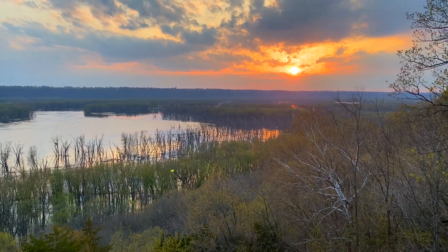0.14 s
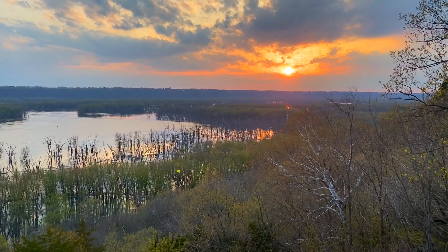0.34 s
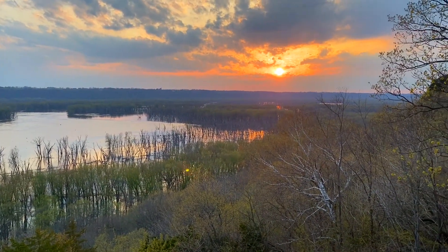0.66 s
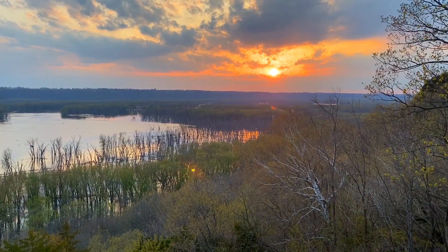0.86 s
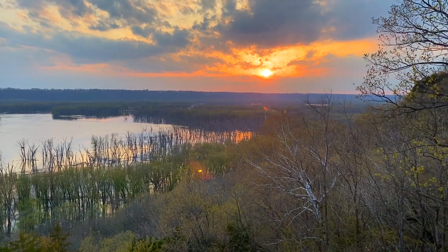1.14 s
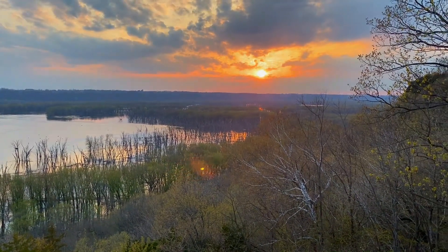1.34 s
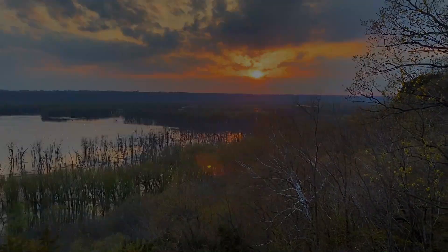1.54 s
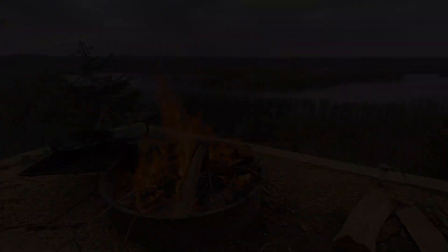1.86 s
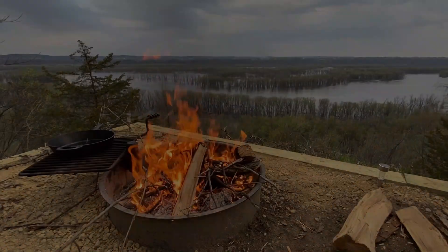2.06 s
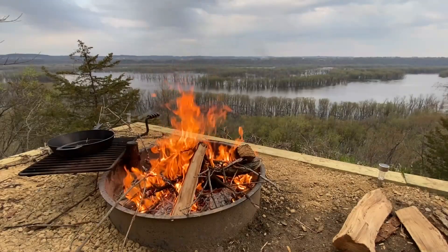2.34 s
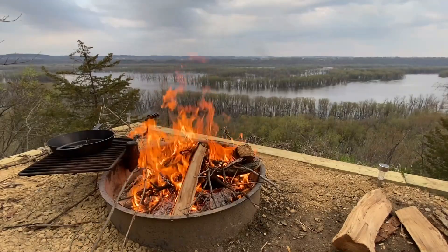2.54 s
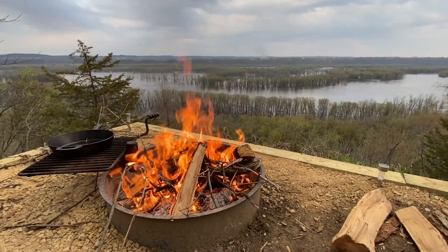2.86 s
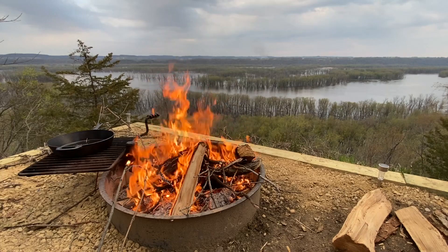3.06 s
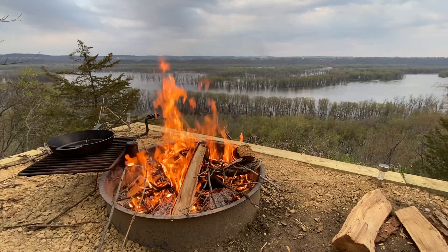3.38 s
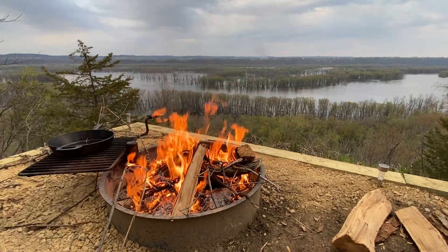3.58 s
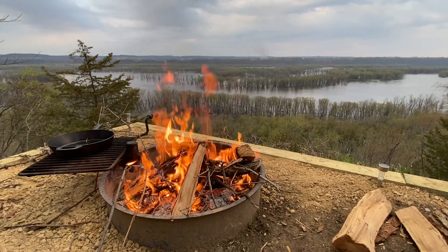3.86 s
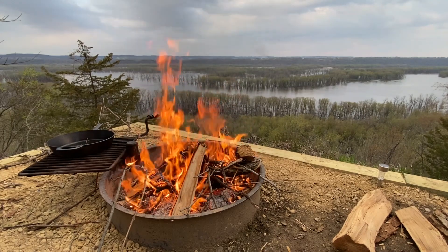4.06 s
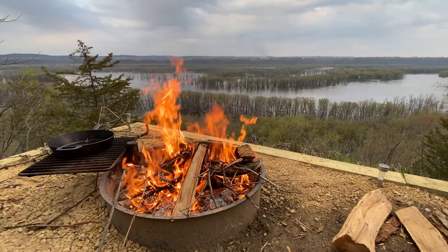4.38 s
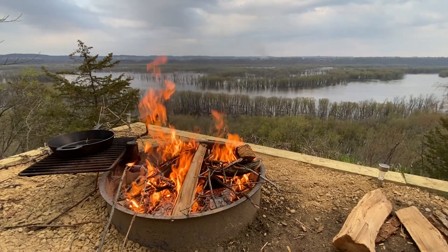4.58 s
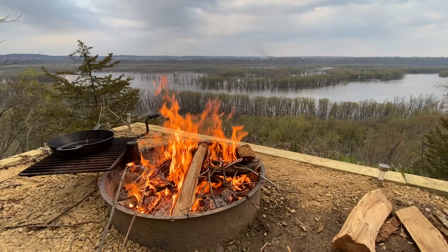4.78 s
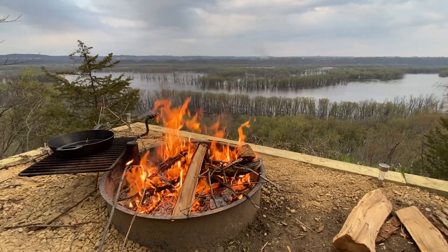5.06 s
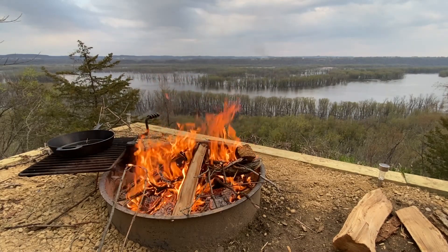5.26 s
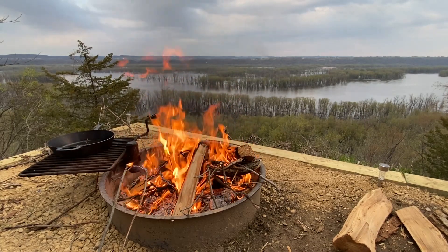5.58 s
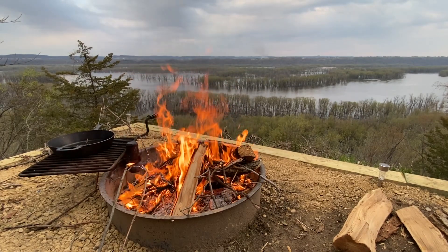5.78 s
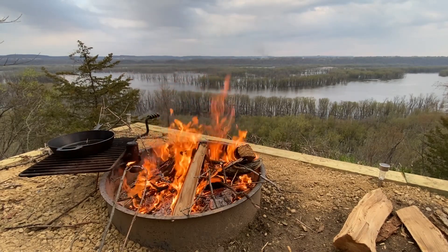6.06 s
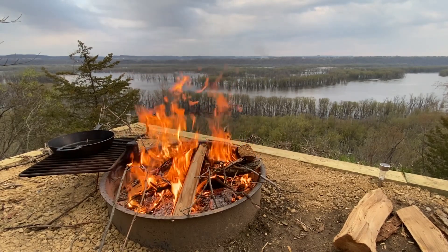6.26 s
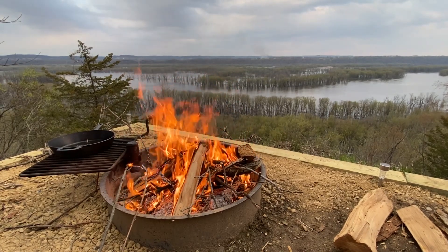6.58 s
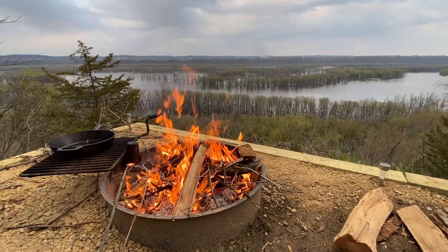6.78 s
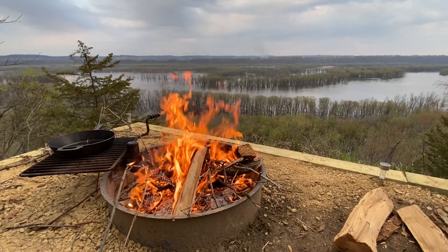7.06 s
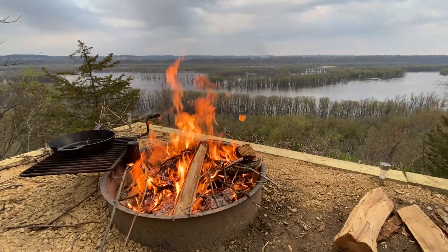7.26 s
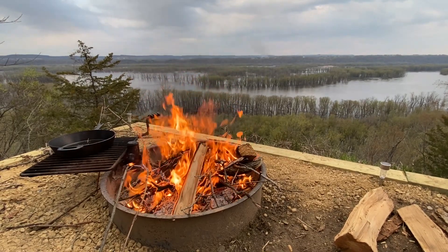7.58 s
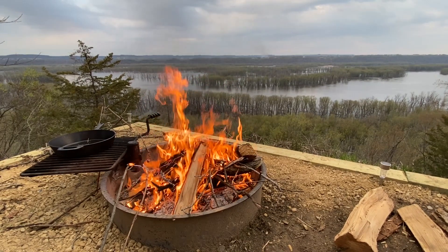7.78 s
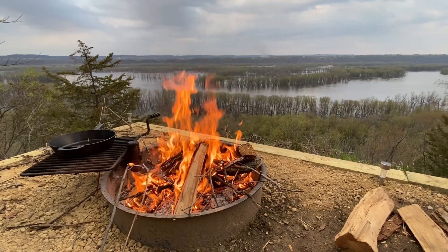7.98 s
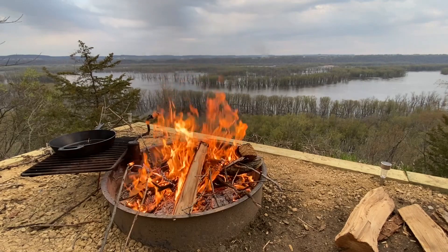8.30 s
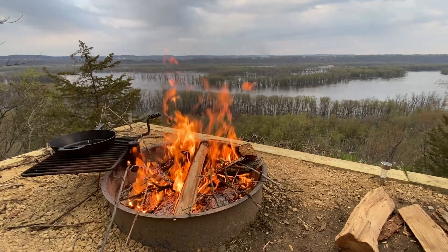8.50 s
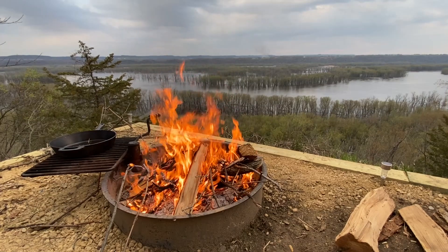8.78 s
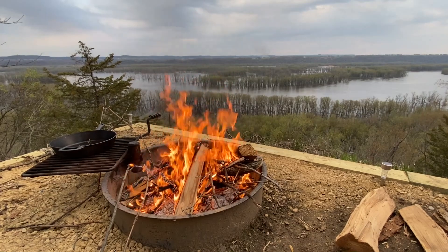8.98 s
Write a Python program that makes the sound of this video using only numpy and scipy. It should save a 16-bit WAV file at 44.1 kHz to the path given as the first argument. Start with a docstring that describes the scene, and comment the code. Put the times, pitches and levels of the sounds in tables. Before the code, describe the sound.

First, very soft open air with faint rumble, a small bird repeating upward chirped whistles, and blurred honks far away; dry twigs click. Then a hard cut brings a close outdoor campfire: uneven low flame rumble, light hiss, countless tiny ticks and scattered bright cracks spread across left and right. A brief gas hiss comes midway, and later heavy snaps and two woody thuds, before crackling continues to the end.

```python
"""A songbird repeats an upslurred whistle on a bluff above a river at dusk, over a far rumble; other birds call
far off, twigs tick and leaves brush past. The voices are gliding sines, the rest is shaped noise.
Then at once a wood fire in a steel ring, close by: filtered noise roars, flutters and sizzles, short noise bursts
tick and pop, decaying sines ring and thud in the wood, and one pocket vents in a short jet that flares.
Left and right each hear the fire with their own colour."""
import sys
import numpy as np
from scipy import signal
from scipy.fft import rfft, irfft, next_fast_len
from scipy.io import wavfile
from scipy.ndimage import map_coordinates

SR = 44100
rng = np.random.default_rng(int(sys.argv[2]) if len(sys.argv) > 2 else 0)


def store_pcm(level_fs):
    """Save levels as 16-bit WAV."""
    pcm = np.round(np.clip(level_fs, -1, 1) * 32767).astype(np.int16)
    wavfile.write(sys.argv[1], SR, np.atleast_2d(pcm).T)


N = 403074
TIME = np.arange(N) / SR  # s
FIRE_START = 1.815  # s

# Colour each side gives to the fire's cracks, steam and gas. Each row: frequency in Hz, left gain in dB, right
# gain in dB.
SIDE_COLOUR = [(306, -21.5, -11), (920, -2.5, -1.5), (2240, -4, -8.5), (2860, -8.5, -4), (3470, -3, 3.5),
               (4900, 0.5, -1.5), (5380, -5, -22), (5710, -5, 5.5), (6000, -6, -7), (6610, 1.5, 3.5),
               (7500, -13.5, -11), (9730, -4, -2.5), (14750, -3, -3), (16500, -19, -19.5)]


def amp(db):
    """Decibels to gain."""
    return 10 ** (np.asarray(db) / 20)


def unit(x):
    """x at rms 1."""
    return x / np.sqrt(np.mean(x ** 2) + 1e-20)


def along(points, hz, axis=1):
    """One column of (Hz, ..) points, read on a log frequency axis."""
    table = np.array(points, float)
    return np.interp(np.log(hz + 1), np.log(table[:, 0] + 1), table[:, axis])


def wobble(rate):
    """A smooth random curve through normally distributed knots, rate knots a second."""
    knots = rng.standard_normal(int(N * rate / SR) + 4)
    return map_coordinates(knots, [TIME * rate])


def filtered(x, response):
    """x times a gain or complex response of frequency."""
    size = 2 * next_fast_len((N + SR) // 2)
    hz = np.fft.rfftfreq(size, 1 / SR)
    return irfft(rfft(x, size) * response(hz), size)[..., :N]


def causal(gain):
    """The minimum-phase response with this gain: it rings after a click, never before."""
    cepstrum = irfft(np.log(np.maximum(gain, 1e-6)))
    half = cepstrum.shape[-1] // 2
    cepstrum[..., 1:half] *= 2
    cepstrum[..., half + 1:] = 0
    return np.exp(rfft(cepstrum))


def draught(apart):
    """Stereo white noise: one part common to both sides, plus apart times a part of each side's own."""
    return rng.standard_normal(N) + apart * rng.standard_normal((2, N))


def woods(x, t60, wet_db):
    """Trees scatter a call into a decaying diffuse tail, different on each side."""
    t = np.arange(SR) / SR
    tail = rng.standard_normal((2, SR)) * amp(-60 * t / t60)
    tail /= np.linalg.norm(tail[0])
    return amp(wet_db) * signal.fftconvolve(x[None], tail, axes=1)[:, :N]


def bursts(rows, octaves, snap_t60, tail_db, tail_t60, ring=5.1, sharpness=14, apart=1.0, size=1024):
    """Stereo noise bursts (s, dB over 5 ms, centre Hz): a sharp snap, then scatter that differs left and right."""
    s, db, centre = np.transpose(rows)
    lead_in = size // 16  # samples
    t = (np.arange(size) - lead_in) / SR
    age = np.maximum(t, 0)
    common = rng.standard_normal((len(s), size))
    own = rng.standard_normal((2, len(s), size))
    snap = common * amp(-60 * age / snap_t60)
    scatter = (common + apart * own) * amp(tail_db - 60 * age / tail_t60)
    hz = np.fft.rfftfreq(size, 1 / SR) + 1
    band = np.exp(-.5 * (np.log2(hz / centre[:, None]) / octaves) ** 2)
    # every splinter rings briefly at a pitch of its own near the centre of its burst
    pitch = centre[:, None] * 2 ** (0.22 * rng.standard_normal((len(s), 1)))
    detune = hz / pitch
    splinter = 1 + ring / (1 + 1j * sharpness * (detune - 1 / detune))
    burst = irfft(rfft((t >= 0) * (snap + scatter)) * band * splinter)
    energy = np.sum(burst ** 2, axis=2).mean(axis=0)
    burst *= (amp(db) / np.sqrt(energy / (.005 * SR)))[:, None]
    where = np.round(s * SR).astype(int)[:, None] - lead_in + np.arange(size)
    return np.array([np.bincount(where.ravel(), side.ravel(), N)[:N] for side in burst])


def valley():
    """Far rumble and air: two noises turned into mid and side, most alike left and right in the bass."""
    # Spectrum of the air. Each row: frequency in Hz, relative level in dB.
    air_colour = [(15, -42), (25, -14), (71, 2), (142, -7.5), (219, -2), (394, -18), (515, -16.5),
                  (952, -26.5), (1030, -24.5), (3540, -37.5), (6720, -39.5), (15000, -53)]
    # Each row: frequency in Hz, left-right correlation (1 is identical, 0 unrelated).
    likeness = [(60, 0.75), (240, 0.72), (950, -0.26), (3770, 0.014), (15000, 0.012)]

    def mid_side(hz):
        turn = np.arccos(np.clip(along(likeness, hz), -1, 1)) / 2
        return amp(along(air_colour, hz)) * [np.cos(turn), np.sin(turn)]

    mid, side = filtered(rng.standard_normal((2, N)), mid_side)
    air = unit(np.array([mid + side, mid - side]))
    rumble = filtered(air, lambda hz: 1 / (1 + (hz / 700) ** 2))
    # only the low part swells and sinks
    return (air - rumble + rumble * amp(3.0 * wobble(11.3))) * amp(-68)


def far_birds():
    """Far honks and whistles, blurred by the distance to one soft tone each; most sag in pitch."""
    # Each row: start in seconds, length in seconds, mid pitch in Hz, level in dB ahead of wobble and mix,
    # fall over the call as a share of the pitch (negative rises).
    call_rows = [(.06, 0.092, 728, -78, .05), (0.152, 0.056, 1620, -75.5, 0.037),
                 (.25, .12, 723, -75, 0.075), (.431, .11, 733, -77, 0.11), (0.407, 0.16, 1410, -83, 0.091),
                 (0.804, .11, 738, -72.5, .14), (0.883, 0.082, 560, -75, .1), (0.959, .05, 618, -74, 0.146),
                 (1.1, .1, 1038, -86, 0), (1.285, 0.079, 1460, -84, -.1), (1.407, 0.093, 1490, -83, 0.016)]
    calls = np.zeros(N)
    for s, length, hz, db, fall in call_rows:
        u = np.clip((TIME - s) / length, 0, 1)
        pitch = hz * (1 + fall * (.5 - u) + .012 * wobble(150))
        tone = np.sin(2 * np.pi * np.cumsum(pitch) / SR)
        calls += amp(db + 2.7 * wobble(120)) * np.sin(np.pi * u) * tone
    return amp(-3.5) * calls + woods(calls, t60=0.67, wet_db=-4.5)


def twigs():
    """Short dry clicks and a hollow knock in the brush: banded noise bursts, a little to the right."""
    # Each row: start in seconds, level in dB over 5 ms ahead of the pan, centre in Hz, width in octaves.
    twig_rows = [(.886, -70.5, 1500, 0.61), (1.016, -71.5, 1540, 0.47), (1.102, -72, 810, 0.13),
                 (1.537, -74, 1630, 0.25), (1.657, -73, 1700, 0.43)]
    s, db, hz, width = np.transpose(twig_rows)
    clicks = bursts(np.c_[s, db, hz], octaves=width[:, None], snap_t60=.014, tail_db=-14, tail_t60=.04, ring=0)
    return clicks * amp([[-1.3], [1.3]])


def rustle(rise_s, fall_s, low_hz, high_hz):
    """A soft brush of dry leaves: banded noise swells and fades, 20 dB per rise_s and per fall_s."""
    peak_s, peak_db = 1.657, -72.5

    def leaf_band(hz):
        return hz / (hz ** 2 + low_hz ** 2) ** .75 / np.sqrt(1 + (hz / high_hz) ** 14)

    leaves = unit(filtered(draught(apart=.7), leaf_band))
    age = TIME - peak_s
    return leaves * amp(peak_db - 20 * np.maximum(-age / rise_s, age / fall_s))


def branches(song, near_db, reach_s, count=12):
    """Nearby trunks send back weak copies that blur every sweep."""
    delays = .004 + reach_s * rng.random((count, 2))  # s
    copies = [sum(np.interp(TIME - d, TIME, song, left=0) for d in side) for side in delays.T]
    return amp(near_db) * np.array(copies) / np.sqrt(count)


def hillside(song, delay_s, echo_db, centre_hz, width_hz):
    """The middle of the whistles carries furthest and returns late as a faint, blurred trail."""
    late = np.interp(TIME - delay_s, TIME, song, left=0)
    blurred = woods(late, t60=1.2, wet_db=0)
    middle = filtered(blurred, lambda hz: np.exp(-.5 * ((hz - centre_hz) / width_hz) ** 2))
    return amp(echo_db + 1.1 * wobble(40)) * middle


def songbird():
    """Each whistle starts low with an octave, steps up, climbs unevenly under a second voice, and flicks down."""
    # Each row: start in seconds, level in dB, foot of the climb in Hz, top of the climb in Hz,
    # octave level in dB, closing flick in seconds, level change over the flick in dB.
    whistle_rows = [(-.039, -64, 2210, 3250, -10, .008, -5), (0.125, -65, 2300, 3400, -9, .007, -2),
                    (.287, -66.5, 2173, 3180, -2, .008, 3), (.463, -68.5, 2220, 3100, -6, 0.013, 1)]
    # The shape they share. Each row: age in seconds, share of the climb, level in dB, octave change in dB,
    # second voice in Hz, second voice level in dB.
    whistle_shape = [(0, 0.076, -12, -12, 3700, -60), (.018, 0, -7.5, 0, 3700, -50),
                     (.025, 0.14, -9, 1, 3720, -19), (.031, 0.42, -5, -22, 3850, -16),
                     (.041, 0.43, -1, -23, 3680, -14), (.048, .83, 0, -25, 3630, -12),
                     (.058, 0.8, -8.5, -25, 3560, -22), (0.063, 0.98, -3, -25, 3500, -35)]
    flick_hz = 1740  # the flick falls by the top pitch less this
    song = np.zeros(N)
    age, *columns = np.transpose(whistle_shape)

    def phase_of(hz):
        return 2 * np.pi * np.cumsum(hz * (1 + .014 * wobble(420))) / SR

    for s, db, low_hz, top_hz, octave_db, flick_s, flick_db in whistle_rows:
        climb, level, octave, upper_hz, upper = [np.interp(TIME - s, age, c) for c in columns]
        flick = np.clip((TIME - s - age[-1]) / flick_s, 0, 1)
        phase = phase_of(low_hz + climb * (top_hz - low_hz) + flick * (flick_hz - top_hz))
        main_voice = amp(level) * (np.sin(phase) + amp(octave_db + octave) * np.sin(2 * phase))
        second_voice = amp(upper) * np.sin(phase_of(upper_hz))
        gate = (TIME > s) * (1 - flick ** 10) * amp(flick_db * np.sqrt(flick))
        song += gate * amp(db + 2.2 * wobble(260)) * (main_voice + second_voice)
    # foliage swallows the octave in the scattered sound
    dulled = filtered(song, lambda hz: 1 / np.sqrt(1 + (hz / 3600) ** 10))
    near = branches(dulled, near_db=-11, reach_s=.04)
    trail = hillside(song, delay_s=.39, echo_db=-3, centre_hz=2720, width_hz=180)
    return song + near + woods(dulled, t60=0.64, wet_db=0.5) + trail


def ports(x, colour):
    """A sound from the fire ring as it arrives left and right: two colours and a phase lead that varies with pitch."""
    # The path from the fire. Each row: frequency in Hz, phase in radians by which the left leads.
    lead_curve = [(0, 0), (260, -0.1), (600, 1.8), (1890, 2.4), (2580, 0.9), (3960, 4.2), (5510, 2.9),
                  (6290, 6.2), (8440, 6.5), (8870, 6.7), (9730, 0.2), (12100, -0.2), (14700, -6.0),
                  (16400, -6.2)]

    def response(hz):
        db = np.array([along(colour, hz, axis=1), along(colour, hz, axis=2)])
        shared = db.mean(axis=0)
        lead = np.interp(hz, *np.transpose(lead_curve))
        return causal(amp(shared)) * amp(db - shared) * np.exp(.5j * np.array([lead, -lead]))
    return filtered(x, response)


def flames(roar_db, flutter_db, rush_db, low_hz, high_hz):
    """Burning gas: big eddies roar, smaller tongues flutter, and a soft rush lies above them."""
    # Colour of the flames. Each row: frequency in Hz, left gain in dB, right gain in dB.
    flame_colour = [(22.5, -26, -34), (35.5, -13, -18), (52.7, -4.5, -2), (76.5, -3.5, -1),
                    (149, -10.5, -4.5), (276, -22, -11.5), (438, -31, -20), (543, -35, -28),
                    (674, -22.5, -21.5), (1330, -29.5, -28.5), (1800, -33, -36.5), (2080, -38, -51.5),
                    (4120, -52.5, -67), (8200, -100, -100)]

    def under(hz, edge):
        return 1 / np.sqrt(1 + (hz / edge) ** 8)

    def over(hz, edge):
        return np.sqrt(1 - under(hz, edge) ** 2)

    def eddies(band, apart):
        return ports(filtered(draught(apart), band), flame_colour)

    flicker = wobble(22)  # shared by flutter and rush
    low = eddies(lambda hz: under(hz, low_hz), apart=0.2)
    middle = eddies(lambda hz: over(hz, low_hz) * under(hz, high_hz), apart=0.19)
    high = eddies(lambda hz: over(hz, high_hz), apart=0.52)
    roar = unit(low * amp(1.1 * wobble(17)))
    flutter = unit(middle * amp(1.15 * flicker))
    rush = unit(high * amp(1.1 * flicker + 1.4 * wobble(50)))
    return roar * amp(roar_db) + flutter * amp(flutter_db) + rush * amp(rush_db)


def sizzle(sizzle_db):
    """Steam sputters out of the end grain: bright noise with fast random level jumps."""
    steam = filtered(draught(apart=0.8), lambda hz: hz / np.hypot(hz, 1800))
    sputter = amp(1.1 * wobble(45) + 1.5 * wobble(500))
    return unit(ports(steam, SIDE_COLOUR) * sputter) * amp(sizzle_db)


def ticks(least_db, spread_db, most_db, follow_s, count=1700):
    """Countless small splinters, in runs of four: most are tiny, some stand out, and they grow with the steam."""
    when, delay, size, pitch = rng.random((count, 4)).T
    run = np.arange(count) // 4
    s = FIRE_START + when[run] * (TIME[-1] - FIRE_START) - follow_s * np.log(delay)
    db = np.interp(s, TIME, least_db) + np.minimum(-spread_db * np.log(size), most_db)
    centre = 11000 * 2 ** (1.5 * (pitch - .5))  # Hz
    snaps = bursts(np.c_[s, db, centre], octaves=1.13, snap_t60=.002, tail_db=-14, tail_t60=0.015,
                   ring=1.2, sharpness=6, size=512)
    return ports(snaps, SIDE_COLOUR)


def jet():
    """Trapped gas finds a way out: a broad, rough hiss that loses its pressure."""
    # Each row: time in seconds, level in dB.
    jet_curve = [(3.585, -95), (3.607, -50), (3.63, -53.5), (3.69, -55), (3.77, -59.5), (3.83, -72),
                 (3.9, -70)]
    gas = filtered(draught(apart=0.45), lambda hz: hz / np.hypot(hz, 500) * np.hypot(1, 2200 / (hz + 100)))
    hiss = unit(ports(gas, SIDE_COLOUR) * amp(1.3 * wobble(300)))
    return hiss * amp(np.interp(TIME, *np.transpose(jet_curve), left=-120, right=-120))


def flare(swell_s, centre_hz, octaves):
    """The vented gas ignites with a short, coarse whoosh: banded noise under a bell-shaped swell."""
    peak_s, peak_db = 3.658, -56.5

    def band(hz):
        return np.exp(-.5 * (np.log2((hz + 1) / centre_hz) / octaves) ** 2)

    gas = filtered(draught(apart=.4), band)
    swell = np.exp(-.5 * ((TIME - peak_s) / swell_s) ** 2)
    return unit(ports(gas, SIDE_COLOUR) * amp(2.7 * wobble(110))) * amp(peak_db) * swell


def small_pockets(crack_db, knock_db, centre_hz, spread_db, knock_spread_db, octaves, count=80):
    """Small pockets burst all through the fire, one at a chance moment in each equal slot: rows for pops()."""
    when, size, pitch, depth = rng.random((count, 4)).T
    s = FIRE_START + (np.arange(count) + when) / count * (TIME[-1] - FIRE_START)
    return np.c_[s, crack_db + spread_db * (2 * size - 1), centre_hz * 2 ** (octaves * (pitch - .5)),
                 knock_db + knock_spread_db * (2 * depth - 1)]


def wood_ring(size=2048):
    """The wood rings where it splits: each mode is a sine that dies within some tens of milliseconds at most."""
    # Each row: start in seconds, pitch in Hz, level in dB over 5 ms ahead of the side colour, t60 in seconds.
    mode_rows = [(2.27, 14940, -35, 0.0045), (3.3986, 4170, -58, 0.013), (3.9497, 6600, -52.5, 0.0061),
                 (4.2658, 3720, -49, 0.0056), (4.4437, 1400, -57, 0.014), (4.4437, 2330, -50, 0.014),
                 (4.4437, 3400, -48.5, .01), (5.1188, 3600, -48.5, 0.0064), (5.1188, 4230, -55, 0.0057),
                 (5.2346, 4020, -60, .008), (6.216, 4900, -42, 0.0056), (6.216, 6500, -47, 0.0049),
                 (6.719, 6200, -51, .008), (6.763, 6840, -48, 0.0072), (7.074, 4150, -54.5, .01),
                 (7.2477, 1100, -43, 0.0097), (7.2477, 2630, -39.5, 0.0025), (7.2477, 3720, -35.5, 0.0052),
                 (7.2477, 10200, -29.5, 0.0071), (7.2477, 13300, -27, 0.004), (7.4523, 393, -37, 0.033),
                 (7.4523, 780, -37.5, 0.019), (7.4523, 1100, -37, 0.011), (7.4523, 2870, -40, .012),
                 (7.4523, 3500, -47, 0.01), (7.4523, 4700, -38, 0.0095), (7.6058, 980, -49, 0.013),
                 (7.6058, 2580, -40.5, .008), (7.6058, 4060, -31, .005), (7.6058, 6230, -36.5, 0.0067),
                 (8.0245, 430, -28, 0.032), (8.0245, 1100, -35, .011), (8.0245, 1450, -45, 0.017),
                 (8.0245, 2230, -46, 0.015), (8.0245, 3100, -40.5, .009), (8.0245, 5600, -44, 0.0071)]
    out, t = np.zeros(N + size), np.arange(size) / SR
    for s, hz, db, t60 in mode_rows:
        ring = np.sin(2 * np.pi * hz * t) * amp(-60 * t / t60)
        out[round(s * SR):][:size] += amp(db) * ring / np.sqrt(np.sum(ring ** 2) / (.005 * SR))
    return out[:N]


def thuds():
    """Gas bursts deep in a log: one low push whose pitch sinks as the cavity opens."""
    # Each row: start in seconds, level in dB ahead of the side colour, starting pitch in Hz.
    thud_rows = [(7.453, -26, 230), (8.0267, -20, 240)]
    die_cycles, sink_cycles = 10.5, 3.6  # counted at the starting pitch: to -60 dB, and to half the pitch
    out = np.zeros(N)
    for s, db, hz in thud_rows:
        cycles = np.maximum(TIME - s, 0) * hz
        sinking = sink_cycles * np.log1p(cycles / sink_cycles)
        out += amp(db - 60 * cycles / die_cycles) * np.sin(2 * np.pi * sinking)
    return out


def pops():
    """Each pocket of sap splits the wood with a bright crack and knocks the log around it."""
    # The louder pockets. Each row: start in seconds, crack level in dB over 5 ms, crack centre in Hz, # log
    # knock level in dB over 5 ms; levels are ahead of the side colour.
    pop_rows = [(1.8294, -50, 12400.0, -57), (1.8894, -53, 10700.0, -71), (1.9244, -43, 10700, -52.5),
                (1.9867, -50, 7200.0, -61), (2.182, -39, 7400, -53.5), (2.2348, -49.5, 10100.0, -58),
                (2.2689, -30.5, 14700, -53.5), (2.3106, -52, 11400.0, -67), (2.3333, -51.0, 11900.0, -64.0),
                (2.3585, -51, 10800.0, -71), (2.7491, -48, 8100, -56), (2.7604, -54, 11000.0, -94),
                (2.9622, -54, 8640, -68), (3.0178, -52, 10000.0, -53.5), (3.2082, -54, 12100.0, -71),
                (3.2196, -49, 10200.0, -74), (3.2506, -46.5, 9900.0, -77.0), (3.3321, -48.5, 11900.0, -74),
                (3.3387, -61, 12500.0, -76), (3.3984, -48.5, 6750, -77), (3.4127, -51.5, 8600.0, -64),
                (3.4508, -50, 13600.0, -61), (3.5039, -41.5, 9500, -59), (3.5106, -39, 11900, -56),
                (3.6687, -36, 11500, -56), (3.9333, -51, 5230, -57), (3.9497, -54, 6400, -63),
                (3.9937, -55, 12100.0, -72), (4.0835, -48, 8400, -57), (4.177, -52, 9700.0, -67),
                (4.1886, -40.5, 12600, -54), (4.2283, -43, 9600, -69), (4.2658, -42, 11100, -50),
                (4.272, -44.5, 11300, -54), (4.4066, -50.5, 10600, -68), (4.4437, -46, 7000, -49),
                (4.4554, -53, 12500.0, -65.0), (4.4797, -50, 7600.0, -54), (4.4897, -53, 10500.0, -65),
                (4.4961, -58, 9800.0, -55), (4.5087, -42, 12400, -63), (4.6768, -51, 6200, -73),
                (4.8587, -56, 9100.0, -62), (4.9129, -54, 12600, -65.0), (4.9927, -45.5, 13800, -80),
                (5.0868, -52, 7260, -54), (5.1186, -41, 7900, -50), (5.1557, -44, 8500, -63),
                (5.1665, -45.0, 11200.0, -62), (5.2346, -49.5, 7400, -53), (5.5039, -37.5, 12600, -52),
                (5.6028, -46, 11300, -55), (5.6795, -51, 4740, -60), (5.777, -48.5, 9300, -69),
                (5.8615, -59, 5470.0, -48.5), (5.9286, -44.5, 8500, -65), (6.082, -49.5, 11900.0, -67),
                (6.1135, -54, 11700.0, -74), (6.1877, -43, 6370, -69), (6.216, -38, 7900, -46),
                (6.3014, -55, 9400.0, -57), (6.308, -55, 11000.0, -69), (6.3818, -53, 9800.0, -82),
                (6.4008, -37.5, 10500, -50.5), (6.4097, -48, 11500.0, -59), (6.4406, -45.5, 8700, -54.5),
                (6.4687, -54, 11000.0, -64.0), (6.4748, -48, 8400.0, -69), (6.5868, -43.5, 8300, -62),
                (6.6073, -54, 9000.0, -64.0), (6.719, -38.5, 9800, -43), (6.763, -43, 7400, -46),
                (6.7786, -51, 5800.0, -54), (7.0147, -52, 12000.0, -79), (7.0235, -49.5, 11900.0, -86),
                (7.074, -55.5, 4800.0, -53), (7.1383, -47.5, 11500, -66), (7.2475, -22, 12500, -35),
                (7.2797, -46, 8700.0, -51), (7.29, -37.0, 9200, -47), (7.3026, -52, 6600.0, -58),
                (7.3522, -46.5, 8500, -48), (7.4057, -36.5, 12000, -52), (7.4153, -52, 9500.0, -65.0),
                (7.4518, -42, 7000, -41), (7.4533, -37.5, 6400, -38.5), (7.4715, -48, 9700, -55),
                (7.5221, -50, 10100, -58), (7.6058, -29.5, 6850, -40), (7.6429, -50, 12000.0, -56),
                (7.7007, -51, 11000.0, -67), (7.7082, -48, 9100.0, -70), (7.7826, -45, 10700.0, -59),
                (7.8059, -42.5, 10500.0, -56), (7.8243, -49, 11700.0, -68), (7.9025, -54, 11100.0, -75),
                (7.9122, -46.5, 11500, -61), (7.9258, -51.5, 10500.0, -59), (7.9799, -28.5, 11400.0, -43.5),
                (7.9977, -39, 10900, -52), (8.0104, -45, 10400.0, -63), (8.0243, -36.5, 7600, -34),
                (8.0259, -41, 8600, -42), (8.0335, -41.5, 4970, -50), (8.1383, -50, 11500, -65.0),
                (8.4151, -46, 13100.0, -65.0), (8.4303, -45, 8800, -61), (8.506, -47, 8000, -46),
                (8.61, -51, 9700, -48), (8.694, -54, 5300.0, -50), (8.7037, -53.5, 8800.0, -57),
                (8.8086, -40, 7600, -63), (8.8221, -52, 14900.0, -69), (8.8302, -47, 10100.0, -55),
                (8.8562, -46.5, 10600, -56), (8.9633, -47, 10900.0, -46.5), (8.9919, -39.5, 10200, -53.5),
                (9.085, -37.5, 11100, -56), (9.1079, -44, 14200.0, -65.0)]
    small = small_pockets(crack_db=-53.0, knock_db=-66.5, centre_hz=9700, spread_db=0.0,
                          knock_spread_db=15, octaves=0.86)
    s, crack_db, crack_hz, knock_db = np.vstack([pop_rows, small]).T
    knock_hz = np.full(len(s), 1150.)
    crack = bursts(np.c_[s, crack_db, crack_hz], octaves=1.1, snap_t60=0.0022, tail_db=-17.5, tail_t60=0.02,
                   ring=1.4)
    knock = bursts(np.c_[s, knock_db, knock_hz], octaves=1.72, snap_t60=0.011, tail_db=-18.5, tail_t60=0.075,
                   ring=1.25, sharpness=3.4)
    return ports(crack + knock + wood_ring() + thuds(), SIDE_COLOUR)


def fire():
    """The blaze drives the flames, the low ones most; the steam drives sizzle and ticks."""
    # Strength of the blaze. Each row: time in seconds, level in dB.
    blaze_curve = [(1.82, -59.5), (1.95, -53), (2.37, -58), (2.9, -49.5), (3.35, -49), (3.88, -47),
                   (4.65, -48.5), (4.9, -47), (5.33, -50.5), (5.65, -46.5), (5.95, -50.5), (6.25, -46.0),
                   (7.02, -51.5), (7.25, -47.5), (8.0, -46.5), (8.22, -52.5), (8.7, -48.5), (9.14, -45)]
    # Steam leaving the logs. Each row: time in seconds, level in dB ahead of its wobble.
    steam_curve = [(1.85, -68.5), (2.0, -66), (2.12, -68), (2.45, -72.5), (2.63, -67), (2.75, -71),
                   (3.1, -71.5), (3.55, -70), (3.9, -69), (4.35, -68), (4.48, -70.5), (4.6, -69),
                   (5.0, -71.5), (5.2, -67), (5.4, -72.5), (5.7, -68.5), (6.2, -70), (6.65, -69.5),
                   (7.15, -71), (7.32, -68), (7.9, -69.5), (8.6, -70.5), (8.85, -68.5), (9.1, -69.5)]
    blaze_db = np.interp(TIME, *np.transpose(blaze_curve))
    steam_db = np.interp(TIME, *np.transpose(steam_curve)) + 1.8 * wobble(5.5)
    mean_db = blaze_db.mean()
    surge_db = blaze_db - mean_db
    # flutter and rush gain only part of each dB that the blaze gains
    flutter_db = mean_db - 8 + 0.42 * surge_db + 1.15 * wobble(10.5)
    rush_db = mean_db - 15 + 0.31 * surge_db
    bed = flames(blaze_db + 0.04, flutter_db, rush_db, low_hz=170.5, high_hz=518)
    bed = bed + sizzle(steam_db + 1.5)
    bed = bed + jet() + flare(swell_s=.025, centre_hz=1240, octaves=0.29)
    return bed + ticks(steam_db - 2.5, spread_db=3.5, most_db=11.5, follow_s=0.0073) + pops()


def scene():
    """The quiet view gives way at once to the fireside."""
    fireside = np.clip((TIME - FIRE_START) / 0.0043 + .5, 0, 1)
    view = valley() * amp([[-.9], [.9]]) + songbird() + twigs() + far_birds()
    view = view + rustle(rise_s=.028, fall_s=0.047, low_hz=900, high_hz=3270)
    return (1 - fireside) * view + fireside * fire()


def record(dry):
    """The top of the band closes: full gain to 16 kHz, half at 16.4 kHz, none above 16.8 kHz."""
    return filtered(dry, lambda hz: np.clip((16400 - hz) / 800 + .5, 0, 1))


dry = scene()
out = record(dry)
store_pcm(out)
```